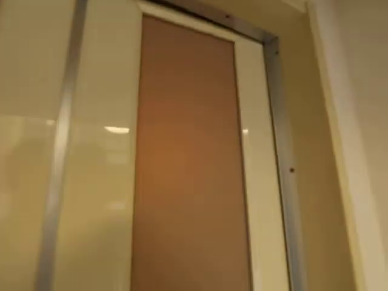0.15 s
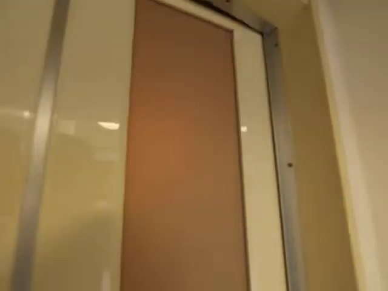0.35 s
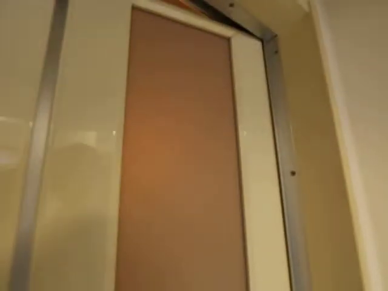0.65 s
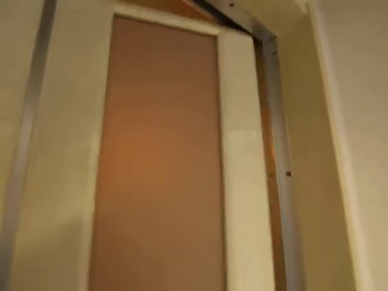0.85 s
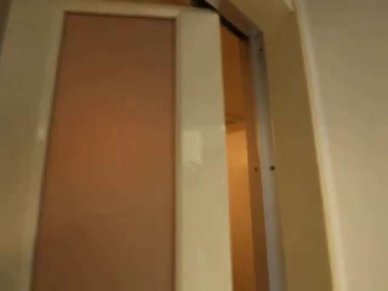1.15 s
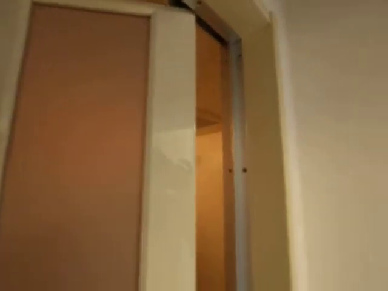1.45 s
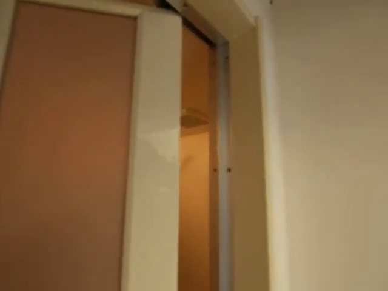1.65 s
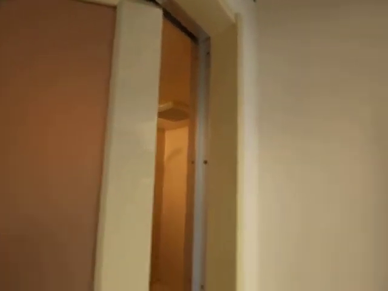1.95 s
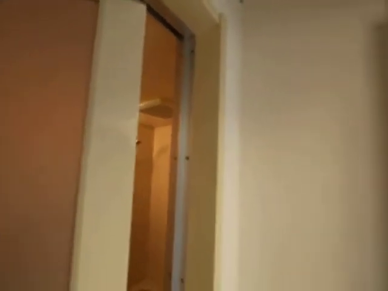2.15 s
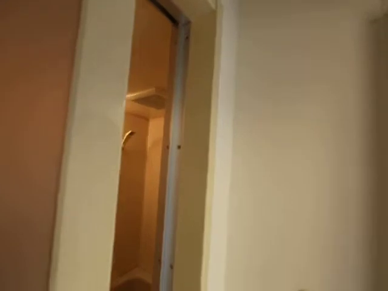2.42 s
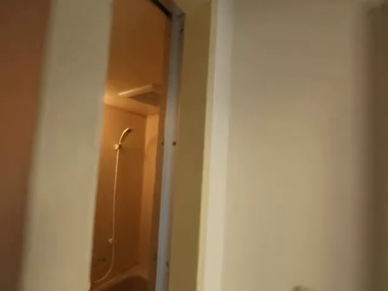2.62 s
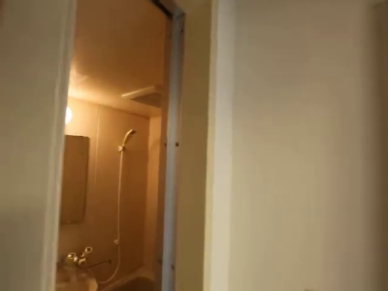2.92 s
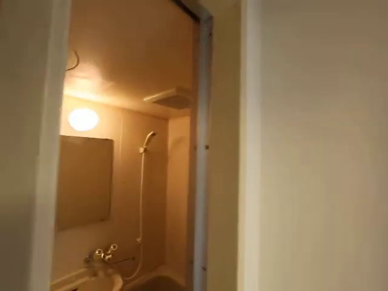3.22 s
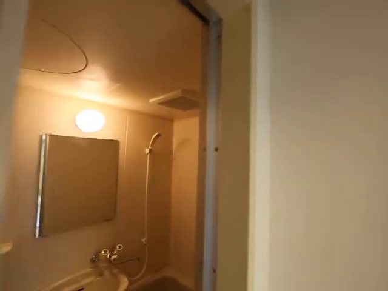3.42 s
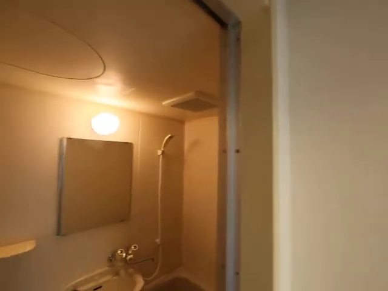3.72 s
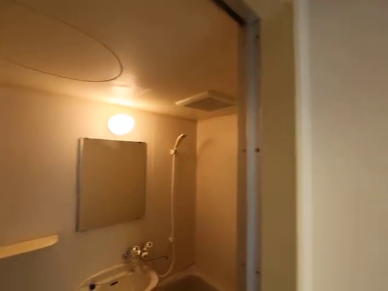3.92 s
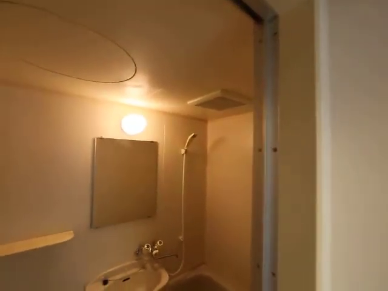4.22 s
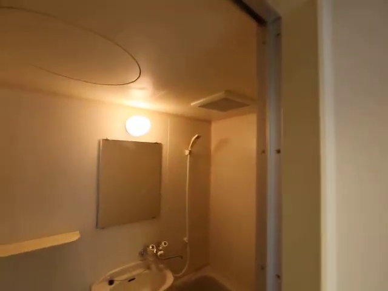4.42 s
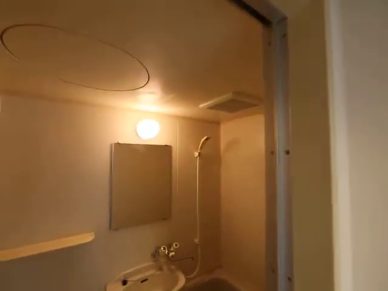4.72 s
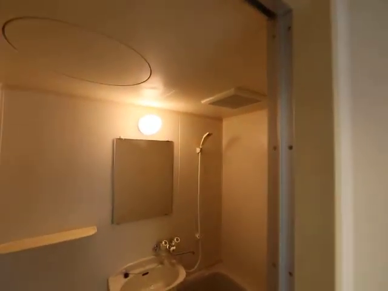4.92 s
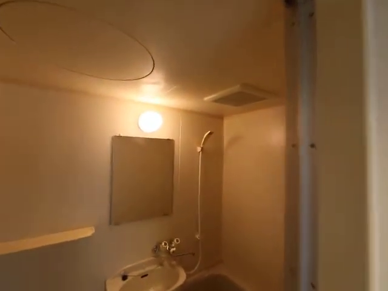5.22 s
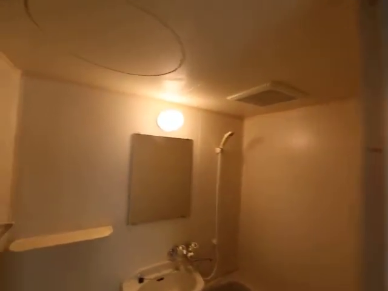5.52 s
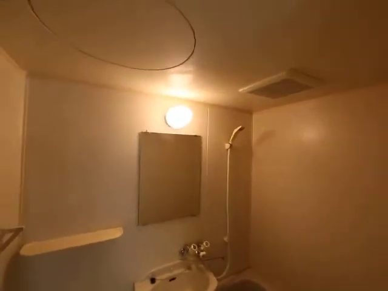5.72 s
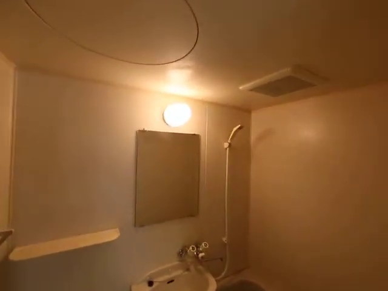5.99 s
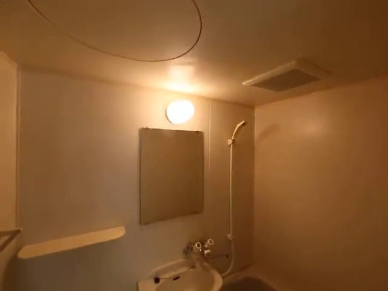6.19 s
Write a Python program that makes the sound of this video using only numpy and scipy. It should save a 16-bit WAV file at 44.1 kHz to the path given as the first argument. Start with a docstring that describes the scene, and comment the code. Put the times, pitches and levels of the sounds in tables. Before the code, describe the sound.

A folding door bumps open with hollow thumps, then rattles and scrapes along its metal track in two pushes, ending with faint creaks.

```python
"""A folding door pushed open.

A sleeve brushes a light bathroom door close by, and its panels buckle loose with hollow thumps.
In two pushes the guide chatters (impact) and scrapes (sliding friction) along its metal track.
Afterwards a joint settles with a few dry stick-slip creaks over the hum of a fan."""
import sys
import numpy as np
from scipy import signal
from scipy.fft import rfft, irfft, next_fast_len
from scipy.io import wavfile

SR = 44100
rng = np.random.default_rng(int(sys.argv[2]) if len(sys.argv) > 2 else 0)


def to_wav(s):
    """Save 16-bit WAV."""
    ch = np.atleast_2d(s).T  # columns
    pcm = np.round(np.clip(ch, -1, 1) * 32767)  # PCM
    wavfile.write(sys.argv[1], SR, pcm.astype(np.int16))


N = 280035

# Levels are relative within each table; spectra list density levels.
# knocks of a panel in its frame: t/s, level/dB, starting f/Hz, number of strikes
KNOCKS = [(0.574, -22, 125, 3), (0.625, -12.5, 136, 1), (0.641, -6.5, 147, 2), (0.667, -6.5, 356, 2),
          (0.684, 2, 133, 1), (0.700, -0.5, 294, 1), (0.708, -1.5, 171, 1), (0.724, 1, 330, 1),
          (0.746, -7.5, 354, 2), (0.830, -13.5, 147, 1), (0.875, -3.5, 296, 1), (0.896, -4, 250, 4),
          (0.962, -15, 376, 1), (0.991, -9.5, 258, 2), (1.094, -16.5, 149, 1), (2.024, -33, 130, 1),
          (2.295, -25, 99, 1), (2.424, -16.5, 151, 3)]
# upper modes of the panel: f/Hz, level/dB, T60/s
PANEL_MODES = [(427, -13.5, 0.043), (580, -21.5, 0.05), (756, -42, 0.023), (1010, -46, 0.022)]
# runs of catches in the track, one row a surge of the door: first t/s, last t/s, count,
# last gap / first gap, first level/dB, last level/dB, offset of every second catch/dB,
# pin f/Hz, offset of the crack/dB
SURGES = [(0.8973, 1.044, 4, 0.89, -23, -21.5, 1, 1980, -9.5),
          (1.0948, 1.22, 3, 1.23, -19.5, -23, 5, 1940, -10.5),
          (2.56, 2.7227, 3, 0.81, -20.5, -26.5, 0, 1900, -9.5),
          (2.7994, 2.9836, 4, .87, -18, -18, 2, 2060, -8),
          (3.045, 3.2268, 4, 0.92, -20.5, -18.5, -1, 1940, -13.5),
          (3.286, 3.3777, 3, .83, -20.5, -15.5, -2.5, 1580, -7.5),
          (3.415, 3.523, 4, .77, -21, -13, -5, 1560, -10.5),
          (3.558, 3.7391, 7, 0.92, -13.5, -17, -4, 2040, -11),
          (3.768, 3.833, 3, 1.0, -15, -20.5, 0, 2000, -14),
          (3.9006, 3.985, 3, 1.05, -19.5, -15.5, 0.5, 1810, -10),
          (4.0803, 4.2242, 3, 1.19, -21, -22.5, 4, 1780, -13.5)]
# modes of the metal track: f/Hz, level/dB, T60/s
TRACK_MODES = [(1170, 1.5, 0.0083), (1407, 2.5, 0.091), (1500, -14, .02), (1667, 8, 0.04), (1866, 5, 0.14),
               (2190, 8, 0.01), (2227, 2, 0.15), (2460, 5.5, 0.081), (2850, 2, 0.12), (4000, -41, .02),
               (5740, -7, 0.13), (8200, -14, 0.024)]
# spectrum of a sharp crack: f/Hz, level/dB
CRACK_SPECTRUM = [(800, -37), (3000, 15), (5000, 8.5), (8000, 5), (10000, -4.5), (16000, -8)]
# how hard the guide rubs, one curve a push: t/s, level/dB
PUSHES = [
    [(0.45, -51), (0.65, -31.5), (0.79, -52.5), (0.85, -47), (0.93, -37.5), (1.12, -36.5), (1.18, -31.5),
     (1.33, -37.5), (1.7, -56.5)],
    [(2.26, -53), (2.335, -29.5), (2.39, -32.5), (2.44, -30), (2.75, -33), (2.81, -26), (2.98, -27.5),
     (3.14, -33.5), (3.55, -29), (3.8, -30), (4.07, -28.5), (4.3, -33), (4.46, -43), (4.7, -51)],
]
# spectra of the sliding door's scrape, hiss and rumble: f/Hz, level/dB
SCRAPE_SPECTRUM = [(120, -26), (200, 8), (270, 4), (315, 7.5), (450, 15.5), (590, 10.5), (866, 11),
                   (1200, 10), (1330, 11), (1550, 5), (1820, 5.5), (2630, -1.5), (2820, -2.5), (4140, -19),
                   (6000, -47), (7800, -54), (13200, -120)]
HISS_SPECTRUM = [(2060, -13.5), (3500, -0.5), (4660, -4), (5300, -1), (5480, -4), (5680, -4), (8000, -10),
                 (9320, -15), (15100, -21.5), (16000, -31)]
RUMBLE_SPECTRUM = [(15, -52), (25, -6), (70, -10.5), (113, 6.5), (178, -8), (280, -5.5), (360, -53),
                   (620, -120)]
# slips of the joint: t/s, level/dB
JOINT_SLIPS = [(5.567, -19), (5.6461, -11), (5.6524, -16), (5.6612, -17), (5.674, -15), (5.7289, -6.5)]
# modes of the joint: f/Hz, level/dB, T60/s
JOINT_MODES = [(152, -29.5, 0.24), (283, -26.5, 0.11), (367, -19, 0.028), (675, -5.5, 0.0062),
               (933, 2.5, 0.0056), (1360, -21.5, 0.018), (2030, -14.5, 0.0069), (2570, -31.5, 0.02),
               (3900, -30, 0.0094)]
# groan of the easing joint: t/s, f/Hz, level/dB
GROAN_CURVE = [(5.746, 277.4, -39), (5.775, 198, -50), (5.8, 195, -39.5), (5.822, 294, -39.5),
               (5.845, 225.5, -37), (5.89, 196, -51)]
# touches of sleeve and fingers: t/s, level/dB, decay time/s, brightness (0-1)
TOUCHES = [(0.109, -27, 0.06, 0.24), (0.183, -29.5, 0.047, 0.26), (0.239, -32.5, 0.035, 0.52),
           (0.271, -32.5, 0.04, 0.44), (0.418, -38, 0.024, 0.37), (0.711, -27.5, 0.0078, 0.1),
           (2.064, -38.5, 0.031, .01), (2.161, -42, 0.038, .01), (2.408, -21, 0.019, 0.22),
           (2.423, -20.5, 0.044, 0.21)]
# spectra of rubbing cloth and fingertips: f/Hz, level/dB
CLOTH_SPECTRUM = [(100, 17.5), (400, 15), (1300, 15.5), (2500, 8), (5000, -12), (8000, -40), (16000, -54)]
FINGER_SPECTRUM = [(1000, -6), (3500, 8), (5500, 5), (8000, -1.5), (12000, -7.5), (16000, -18)]
# squeaks of skin on plastic: t/s, level/dB, f/Hz, decay time/s
SKIN_SQUEAKS = [(0.0975, -31, 12100, 0.0047), (0.916, -25, 7000, 0.0012), (0.949, -24.5, 3640, 0.0093),
                (2.83, -38, 7000, 0.0045), (2.927, -32, 14300, 0.0065), (4.23, -40, 7400, 0.0083)]
# shifts of clothing: t/s, level/dB, duration/s
CLOTHING_SHIFTS = [(5.283, -47, 0.18), (5.39, -42, .03), (5.931, -44.5, 0.48)]
# spectrum of their swish: f/Hz, level/dB
SWISH_SPECTRUM = [(200, 1), (600, 0.5), (1400, 4), (1750, 0), (2200, -0.5), (2800, -2.5), (3500, -7),
                  (7000, -12.5), (10000, -18), (16000, -27)]
# spectrum of the fan's air noise: f/Hz, level/dB
AIR_SPECTRUM = [(12, -51), (20, -45), (48, -22.5), (123, -12), (154, -17), (187, -12), (216, -20),
                (367, -20), (410, -20.5), (527, -21), (574, -24.5), (678, -21), (1910, -32),
                (7950, -40.5), (16000, -47)]
# reverberation time of the room: f/Hz, T60/s
ROOM_DECAY = [(100, 0.97), (300, 1), (1000, 0.93), (2200, 0.6), (5000, 0.33), (14000, 0.15)]
# the pin's impact and rebounds, and the joint's early reflections: delay/s, amplitude ratio
PIN_IMPACTS = [(0, 1), (.0016, .8), (.0029, .5), (.008, .22)]
JOINT_ECHOES = [(.0021, .22), (.0031, .3), (.0145, .07), (.021, .08)]


def panel_thumps(swell_s=.002, sag_s=.0048, low_hz=104, sway_s=.008, sway_hz=88,
                 rebound_s=.0105, rebound_db=-.7, hardening=2.6):
    """Dispersion of bending waves: each knock arrives high first and sags to the panel's low note."""
    out, t = np.zeros(N), np.arange(SR // 10) / SR
    sway = amp(-15) * t / sway_s * np.exp(1 - t / sway_s) * np.sin(2 * np.pi * sway_hz * t)  # whole leaf
    clack = modes(PANEL_MODES, t).sum(0) * (1 - np.exp(-t / .00076))
    for s, first_db, hz, count in KNOCKS:
        cycles = np.cumsum(low_hz + (hz - low_hz) * np.exp(-t / sag_s)) / SR
        flex = t / swell_s * np.exp(1 - t / swell_s) * np.sin(2 * np.pi * cycles)
        for db in first_db + rebound_db * np.arange(count):  # a loose panel strikes on each swing
            upper = amp(hardening * db) * clack  # harder knocks reach higher modes
            add(out, s, amp(db) * (flex + sway) + upper)
            s += rebound_s * (1 + .17 * rng.standard_normal())
    return out


def guide_chatter(pin_decay_s=.00099, contact_s=.0001, choke_s=.0094):
    """Impact excitation: the guide pin snaps free, rebounds between the track's walls and rings them."""
    out, t = np.zeros(N), np.arange(SR // 10) / SR
    burst = np.exp(-(t / .004) ** 2) + .2 * np.exp(-t / .012)
    pin_envelope = (1 - np.exp(-t / contact_s)) * np.exp(-t / pin_decay_s)
    damping = np.exp(-t / choke_s)  # the pin presses on the track and chokes it
    bands_hz = np.geomspace(1000, 16000, 16)
    for s, db, hz, crack_db in catches():
        rattle = np.zeros(len(t))
        for delay_s, share in PIN_IMPACTS:
            late, detune = rng.uniform([.9, .94], [1.1, 1.05])
            add(rattle, delay_s * late, share * pin_envelope * np.sin(2 * np.pi * hz * detune * t))
        # each spot on the track rings and cracks differently
        tuning = rng.uniform(.975, 1.02)
        ring = rng.choice([-.5, .5], len(TRACK_MODES)) @ modes(TRACK_MODES, t * tuning)
        rattle += amp(-14) * ring * damping
        rattle /= rattle[:SR // 250].std()
        bands_db = value_at(CRACK_SPECTRUM, bands_hz) + rng.normal(0, 3.4, len(bands_hz))
        crack = noise(np.transpose([bands_hz, bands_db]), len(t)) * burst
        add(out, s, amp(db + 1) * rattle + amp(db + crack_db) * crack)
    return out


def catches():
    """Quasi-periodic impacts, their gaps changing linearly in a surge: t/s, level/dB, f/Hz, crack/dB."""
    rows = []
    for first_s, last_s, count, gap_ratio, first_db, last_db, second_db, hz, crack_db in SURGES:
        elapsed = np.append(0, np.cumsum(np.linspace(1, gap_ratio, count - 1)))
        times = first_s + (last_s - first_s) * elapsed / elapsed[-1]
        db = np.linspace(first_db, last_db, count) + second_db * (np.arange(count) % 2)
        rows += zip(times, db, [hz] * count, [crack_db] * count)
    return np.array(rows)


def guide_scrape(slips_per_s=5000, full_catches_per_s=33.6, folding_db=-11):
    """Sliding friction: countless tiny slips excite track and panels, and the hiss grows with speed."""
    slips = rng.standard_normal(N) * (rng.random(N) < slips_per_s / SR)
    grain_db = -.5 * np.minimum(rng.exponential(1, N), 4)
    slips *= amp(grain_db + .98 * drift(33))
    hz = np.fft.rfftfreq(N, 1 / SR)
    resonances = sum(amp(db) / (1 + 1j * (hz - f) * t60) for f, db, t60 in TRACK_MODES)
    ring = unit_rms(irfft(rfft(slips) * resonances, N))
    body = amp(1) * (colour(slips, SCRAPE_SPECTRUM) + .14 * ring)
    hiss = amp(-5) * unit_rms(colour(slips, HISS_SPECTRUM) + noise(HISS_SPECTRUM))
    rumble = amp(-8 + drift(6.2)) * noise(RUMBLE_SPECTRUM)
    out = np.zeros(N)
    for push in PUSHES:
        s, db = np.transpose(push)
        pace = door_speed(s[0], s[-1]) / full_catches_per_s
        out += envelope(s, db) * (body + hiss * pace ** .93)
        # over each push the leaves fold up, stiffen and rumble less
        folded = np.clip((np.arange(N) / SR - s[0]) / (s[-1] - s[0]), 0, 1)
        out += envelope(s, .7 * db) * rumble * amp(folding_db * folded ** 2)
    return out


def door_speed(from_s, to_s, run_up_s=.7, coast_s=.16, creep_per_s=1.7):
    """Rate is the reciprocal of period: the speed during one push, in catches a second."""
    s = catches()[:, 0]
    s = s[(s > from_s) & (s < to_s)]
    times = [s[0] - run_up_s, *s, s[-1] + coast_s]
    rates = [creep_per_s, *(1 / np.gradient(s)), creep_per_s]
    return np.interp(np.arange(N) / SR, times, rates)


def joint_creaks(contact_s=.00061, hardening=1.8):
    """Stick-slip: each slip rings the damped joint, and the frame and nearby walls reflect it."""
    direct, t = np.zeros(N), np.arange(SR // 5) / SR
    ring = modes(JOINT_MODES, t).sum(0) * (1 - np.exp(-t / contact_s))
    ring = highpass(ring, hz=110)  # too small to radiate bass
    strain = scatter(from_s=5.42, to_s=5.53, db=-29, count=7)  # the joint takes up the load
    for s, db in [*strain, *JOINT_SLIPS]:
        snap = noise(CRACK_SPECTRUM, len(t)) * np.exp(-t / .0012)
        add(direct, s, amp(db + 7) * ring + amp(hardening * db - 18) * snap)  # big slips snap sharply
    out = direct.copy()
    for delay_s, share in JOINT_ECHOES:
        add(out, delay_s, share * direct)
    return out


def joint_groan(octave_db=-9, roughness=.65):
    """Frictional self-oscillation: fast, uneven slips of the joint merge into a short low tone."""
    s, hz, db = np.transpose(GROAN_CURVE)
    phase = 2 * np.pi * np.cumsum(np.interp(np.arange(N) / SR, s, hz)) / SR
    tone = np.sin(phase) + amp(octave_db) * np.sin(2 * phase)
    return envelope(s, db) * tone * (1 + roughness * drift(60))


def hand_brushes(rise_s=.00059, grip_decay_s=.012, grip_brightness=.59):
    """Friction noise: short rubs on the door, dull for the sleeve and bright for the fingertips."""
    out, t = np.zeros(N), np.arange(SR // 3) / SR
    grip = scatter(from_s=.52, to_s=.76, db=-38, count=6)  # the fingers take hold
    scuffs = [(s, db, grip_decay_s, grip_brightness) for s, db in grip]
    for s, db, decay_s, bright in [*TOUCHES, *scuffs]:
        cloth, finger = noise(CLOTH_SPECTRUM, len(t)), noise(FINGER_SPECTRUM, len(t))
        rub = unit_rms((1 - bright) * cloth + bright * finger)
        add(out, s, amp(db + 1) * rub * (1 - np.exp(-t / rise_s)) * np.exp(-t / decay_s))
    return out


def skin_squeaks(skirt_db=-28):
    """Stick-slip of skin on plastic: a brief whistle in one narrow treble band."""
    out, t = np.zeros(N), np.arange(SR // 10) / SR
    for s, db, hz, decay_s in SKIN_SQUEAKS:
        band = [(hz / 8, -70), (hz * .65, skirt_db), (hz * .9, 0),
                (hz * 1.12, -2), (hz * 1.5, skirt_db), (hz * 8, -70)]
        add(out, s, amp(db + 1) * noise(band, len(t)) * np.exp(-t / decay_s))
    return out


def clothing_rustle(rise_s=.024, sag_db_per_s=-7, fall_s=.035, flutter_db=2):
    """Amplitude-modulated friction noise: each swish of cloth rises quickly, sags and dies away."""
    swell, t = np.zeros(N), np.arange(SR) / SR
    for s, db, length_s in CLOTHING_SHIFTS:
        shape = np.minimum(t / rise_s, 1) * np.exp(-np.maximum(t - length_s, 0) / fall_s)
        add(swell, s, amp(db - 2 + sag_db_per_s * t) * shape)
    return noise(SWISH_SPECTRUM) * swell * amp(flutter_db * drift(21))


def ceiling_fan(hum_hz=120, waver_hz=3, hum_db=-49, air_db=-47.5):
    """Superposition of tone and broadband noise: a wavering hum in a steady rush of air."""
    phase = 2 * np.pi * np.cumsum(hum_hz + waver_hz * drift(13.2)) / SR
    hum = amp(hum_db + 2 * drift(1.4)) * np.sqrt(2) * np.sin(phase)
    return hum + amp(air_db) * noise(AIR_SPECTRUM)


def room(x):
    """Reverberation: sparse reflections of random sign, each band decaying at its own rate."""
    taps = rng.choice([-1., 1.], SR) * (rng.random(SR) < .1)
    taps[:SR // 200] = 0  # no reflection in the first 5 ms
    hz, t, bands = signal.stft(taps, SR, nperseg=256)
    decay = amp(-60 * t / value_at(ROOM_DECAY, hz)[:, None])
    tail = signal.istft(bands * decay, SR, nperseg=256)[1]
    return signal.fftconvolve(x, tail / np.linalg.norm(tail))[:N]


def amp(db):
    """Amplitude ratio of a level."""
    return 10 ** (np.asarray(db) / 20)


def unit_rms(x):
    """Normalisation to rms 1."""
    return x / np.sqrt(np.mean(x ** 2) + 1e-20)


def value_at(points, hz):
    """Linear interpolation on a log-frequency axis."""
    f, value = np.transpose(points)
    return np.interp(np.log(hz + 1), np.log(f + 1), value)


def colour(x, spectrum):
    """Spectral shaping of x, at rms 1."""
    size = next_fast_len(len(x))
    gain = amp(value_at(spectrum, np.fft.rfftfreq(size, 1 / SR)))
    return unit_rms(irfft(rfft(x, size) * gain, size)[:len(x)])


def noise(spectrum, size=N):
    """Coloured Gaussian noise of rms 1."""
    return colour(rng.standard_normal(size), spectrum)


def drift(corner_hz):
    """Low-pass random fluctuation of rms 1."""
    hz = np.fft.rfftfreq(N, 1 / SR)
    return unit_rms(irfft(rfft(rng.standard_normal(N)) / (1 + (hz / corner_hz) ** 2), N))


def highpass(x, hz):
    """Second-order bass roll-off."""
    return signal.sosfilt(signal.butter(2, hz, "highpass", fs=SR, output="sos"), x)


def modes(table, t):
    """Free vibration: damped sines, one row a mode."""
    hz, db, t60 = np.transpose(table)[:, :, None]
    return amp(db - 60 * t / t60) * np.sin(2 * np.pi * hz * t)


def envelope(s, db):
    """A level curve as a gain, silent outside its span."""
    return amp(np.interp(np.arange(N) / SR, s, db, left=-np.inf, right=-np.inf))


def scatter(from_s, to_s, db, count):
    """Events jittered in time and strength: t/s, level/dB."""
    place, strength = rng.random((count, 2)).T
    times = from_s + (to_s - from_s) * (np.arange(count) + place) / count
    return np.transpose([times, db + 6 * (strength - .5)])


def add(mix, s, sound):
    """Superposition of a sound on the mix, from time s."""
    part = mix[max(round(s * SR), 0):][:len(sound)]
    part += sound[:len(part)]


def scene():
    """Direct and reverberant sound add at one point close to the door."""
    thumps = panel_thumps()
    chatter = guide_chatter() + skin_squeaks()
    joint = joint_creaks() + joint_groan()
    cloth = hand_brushes() + clothing_rustle()
    reverb = room(amp(-9.5) * chatter + amp(-28) * joint + amp(-12.5) * cloth)
    boom = amp(-30) * room(thumps)  # the panels are so close that direct sound dominates
    return (thumps + chatter + joint + cloth + reverb + boom + guide_scrape() + ceiling_fan())[None]


def record(dry, edge_hz=15900):
    """Band limiting and overload: the microphone sheds deep bass and top treble; loud thumps clip."""
    clipped = np.clip(highpass(dry, hz=24), -1, 1)
    lowpass = signal.firwin(511, edge_hz, window=("kaiser", 9), fs=SR)
    return signal.oaconvolve(clipped, lowpass[None], "same")


dry = scene()
out = record(dry)
to_wav(out)
```